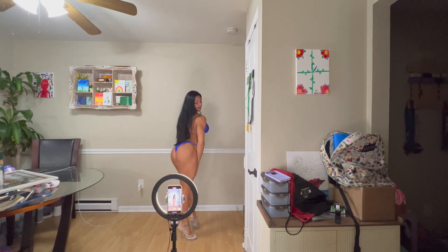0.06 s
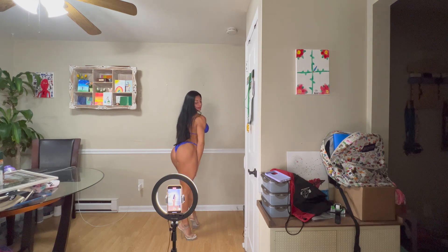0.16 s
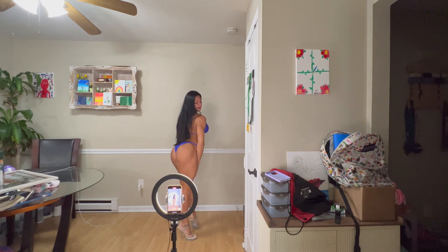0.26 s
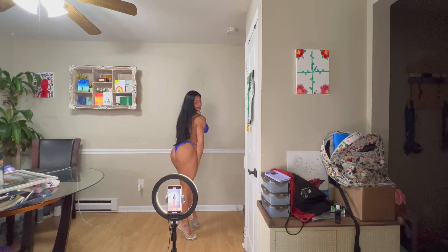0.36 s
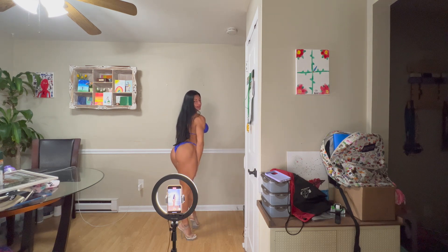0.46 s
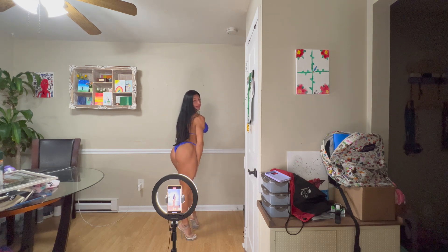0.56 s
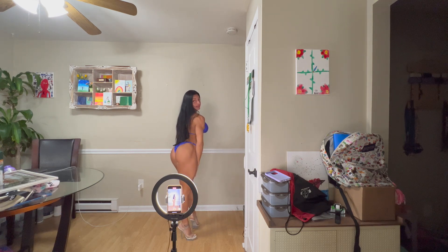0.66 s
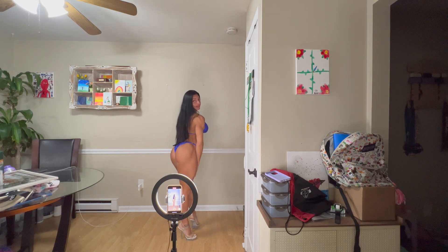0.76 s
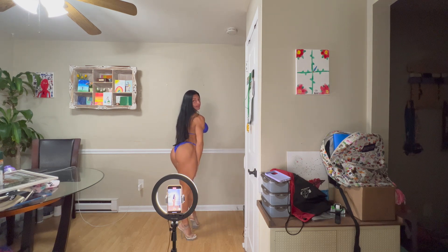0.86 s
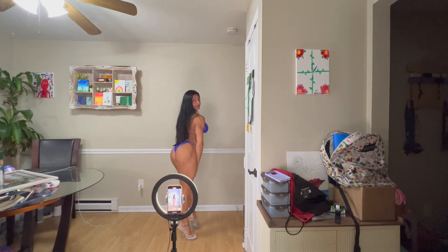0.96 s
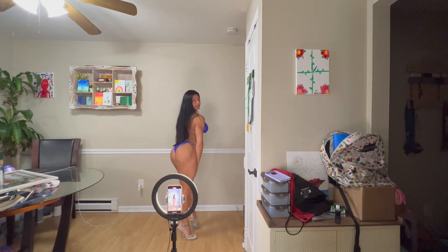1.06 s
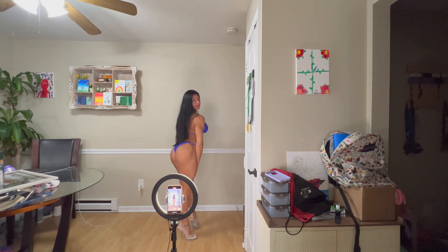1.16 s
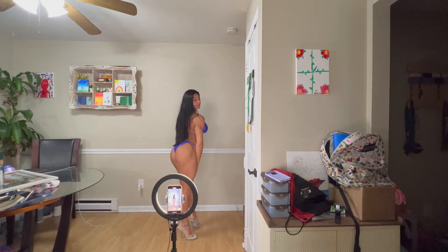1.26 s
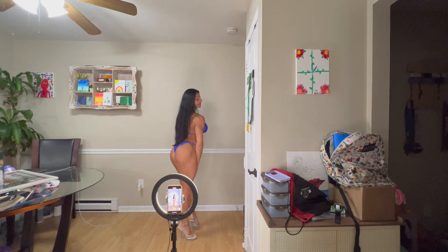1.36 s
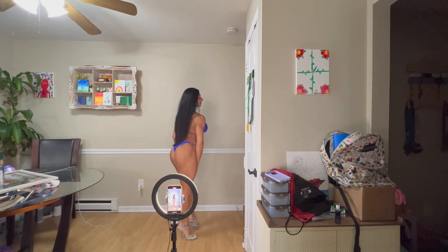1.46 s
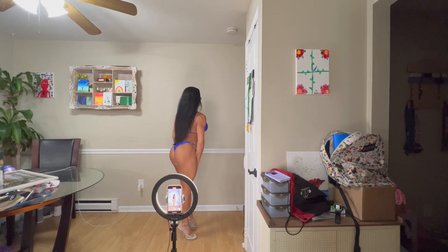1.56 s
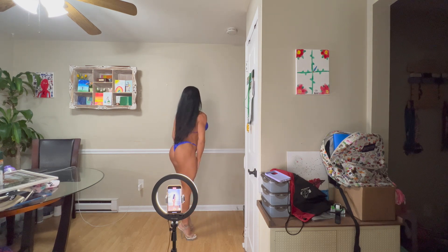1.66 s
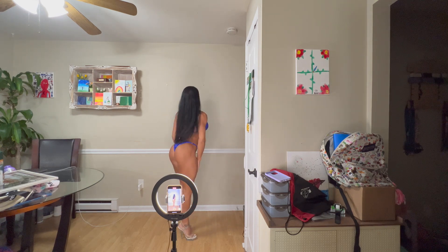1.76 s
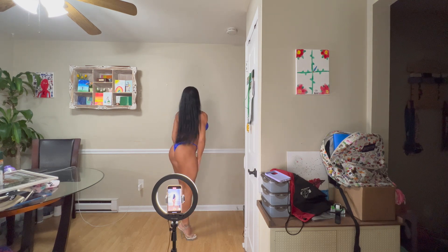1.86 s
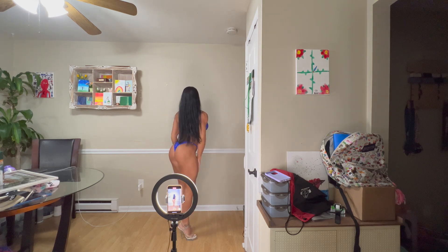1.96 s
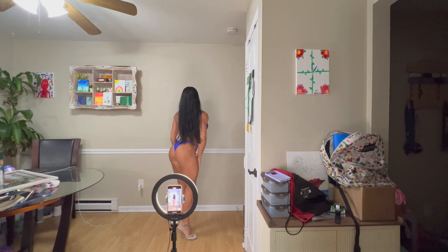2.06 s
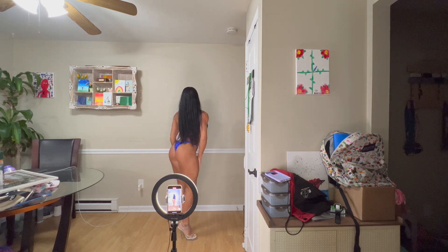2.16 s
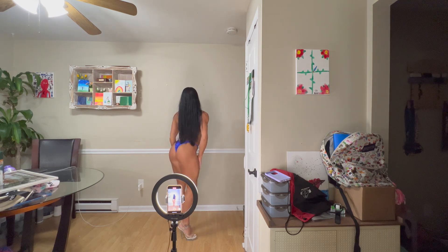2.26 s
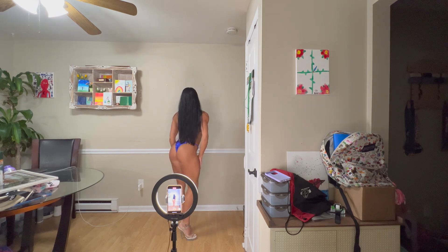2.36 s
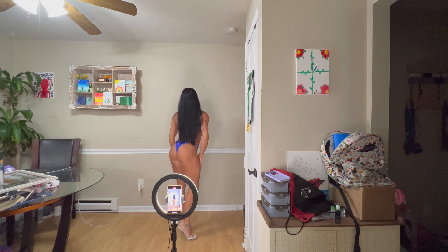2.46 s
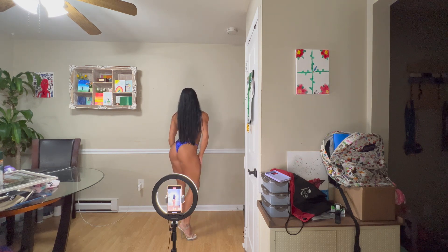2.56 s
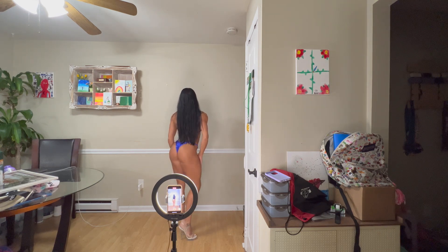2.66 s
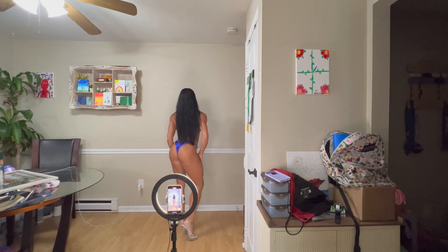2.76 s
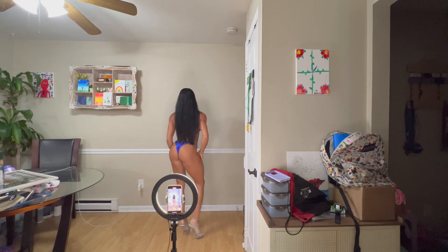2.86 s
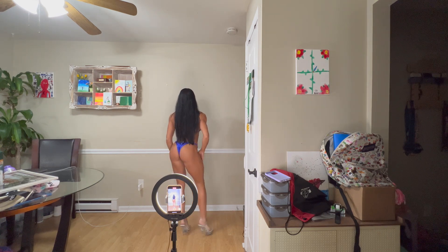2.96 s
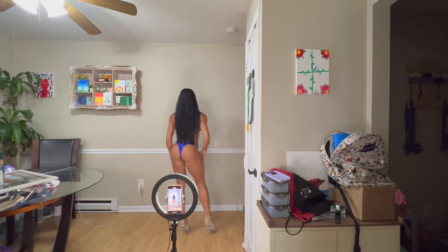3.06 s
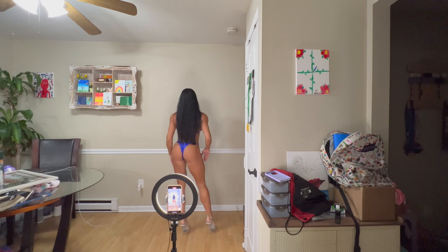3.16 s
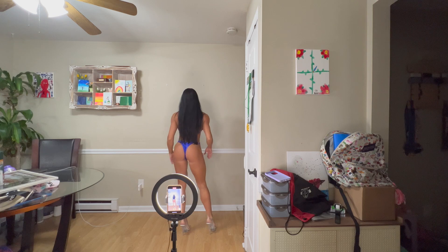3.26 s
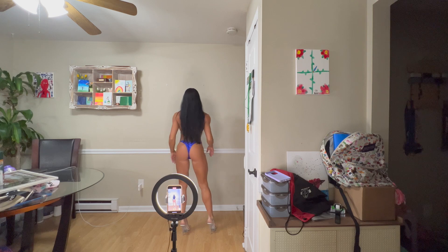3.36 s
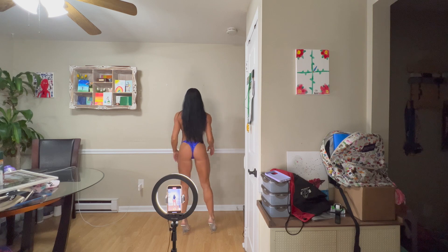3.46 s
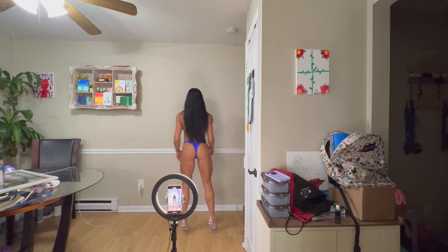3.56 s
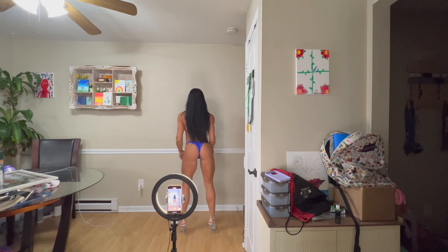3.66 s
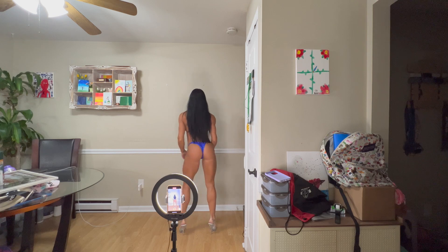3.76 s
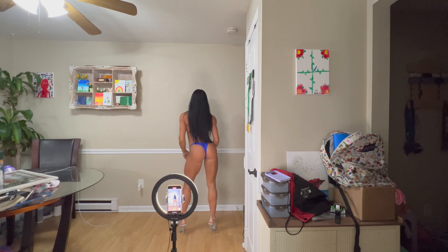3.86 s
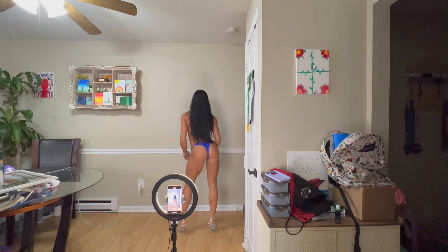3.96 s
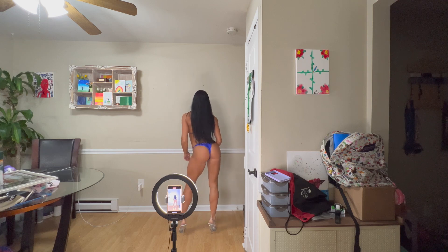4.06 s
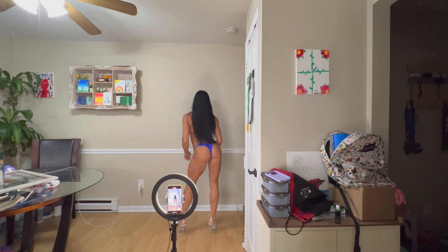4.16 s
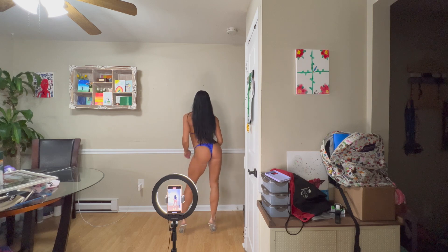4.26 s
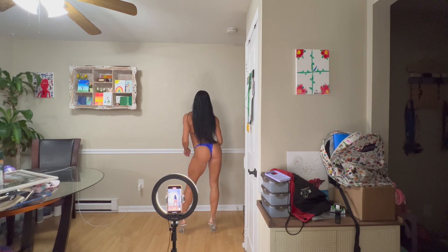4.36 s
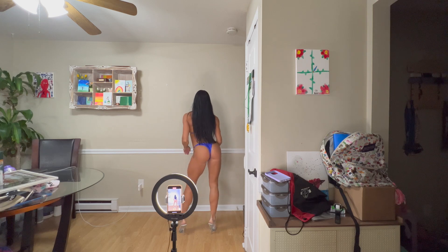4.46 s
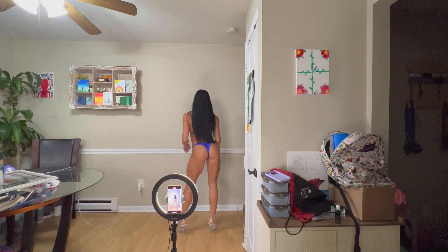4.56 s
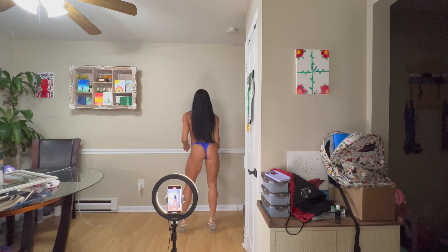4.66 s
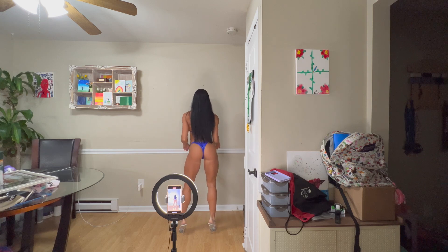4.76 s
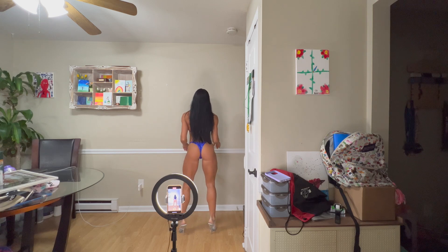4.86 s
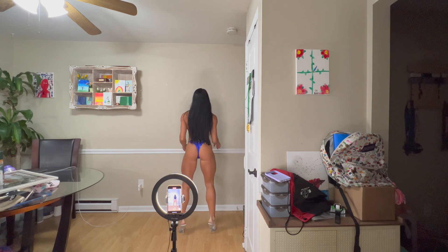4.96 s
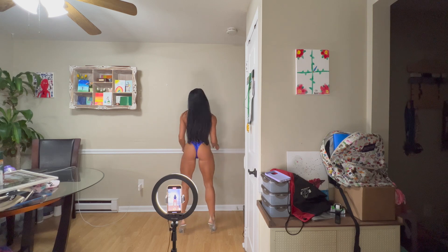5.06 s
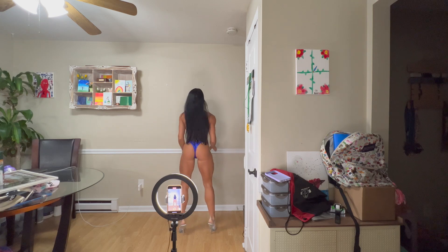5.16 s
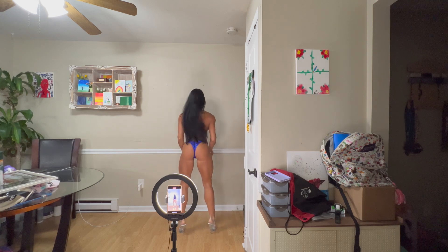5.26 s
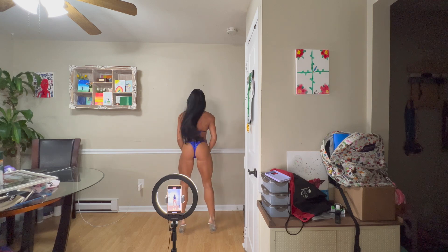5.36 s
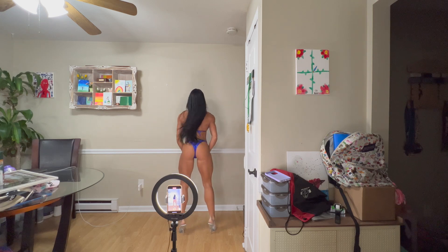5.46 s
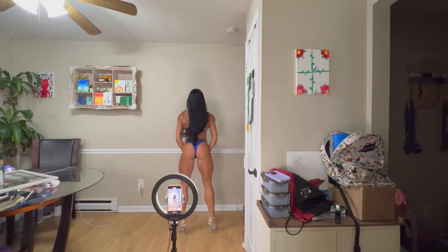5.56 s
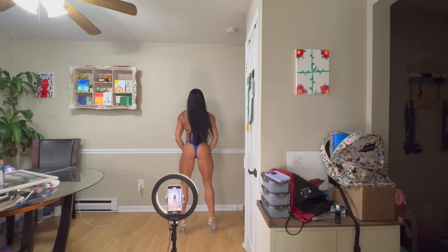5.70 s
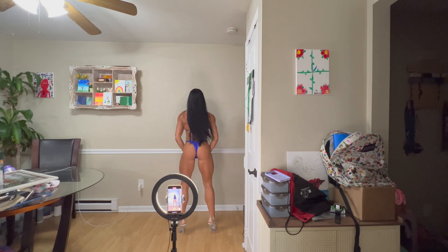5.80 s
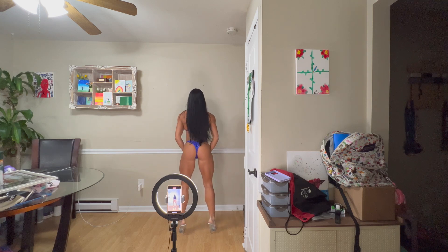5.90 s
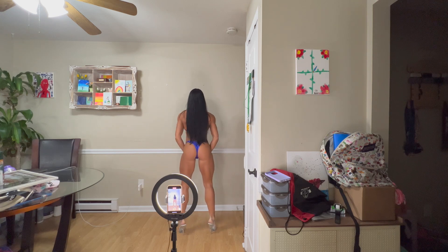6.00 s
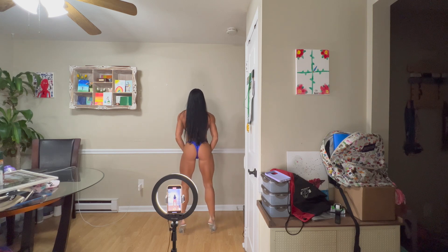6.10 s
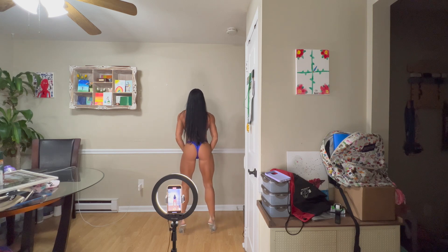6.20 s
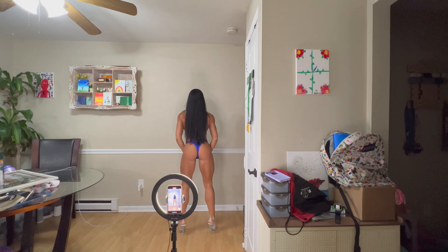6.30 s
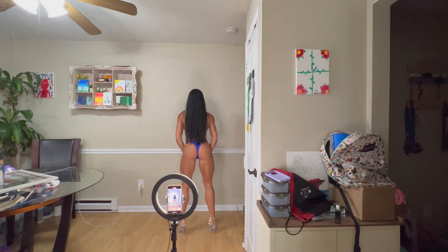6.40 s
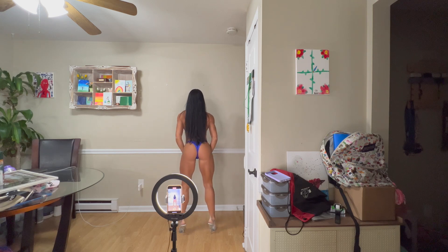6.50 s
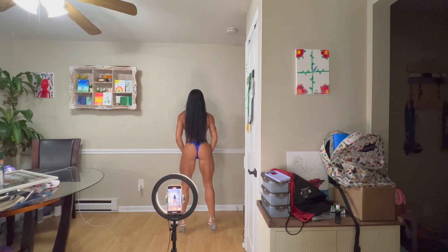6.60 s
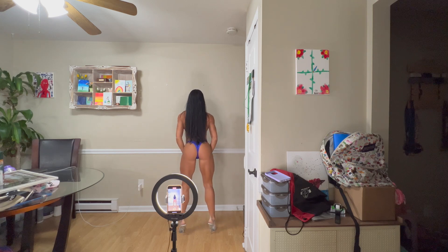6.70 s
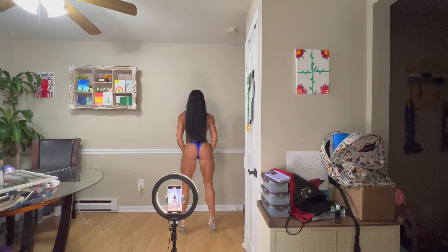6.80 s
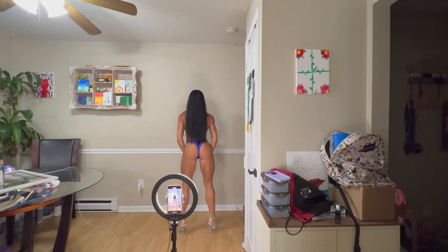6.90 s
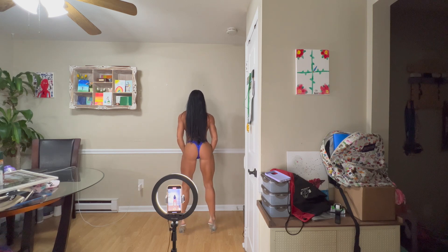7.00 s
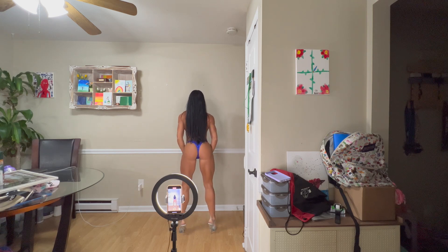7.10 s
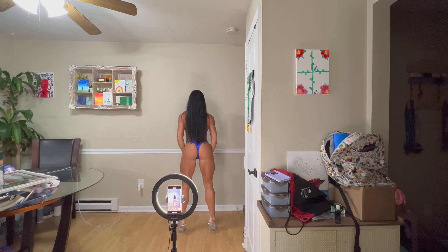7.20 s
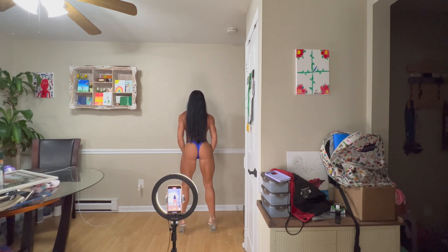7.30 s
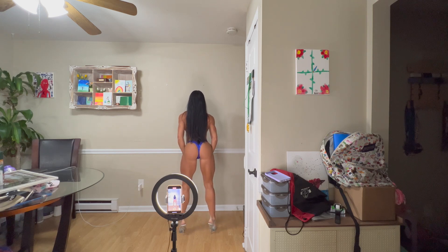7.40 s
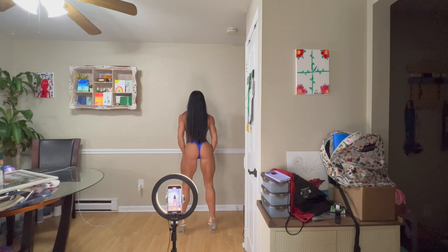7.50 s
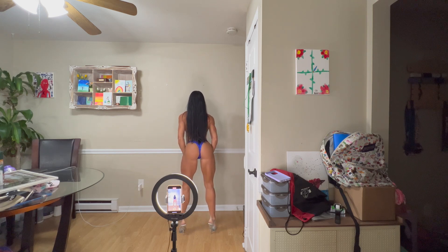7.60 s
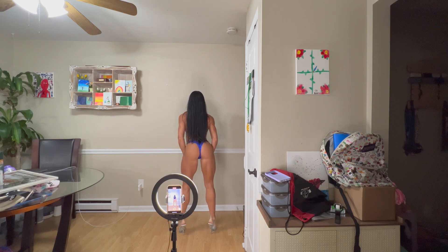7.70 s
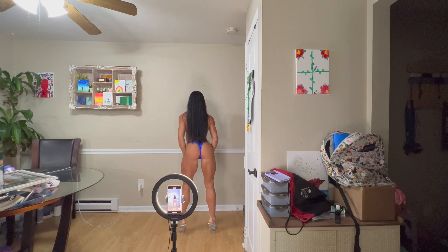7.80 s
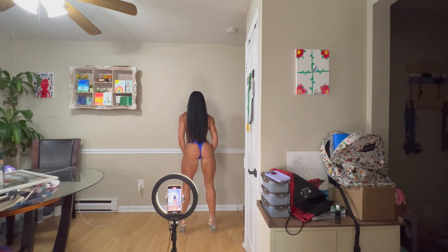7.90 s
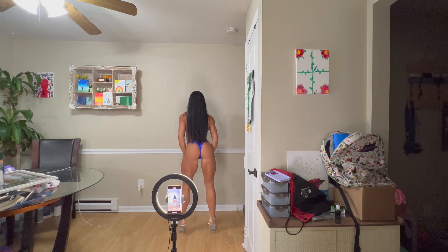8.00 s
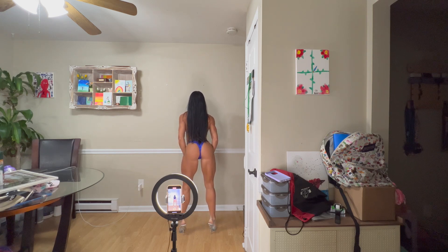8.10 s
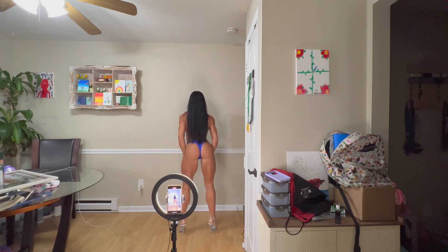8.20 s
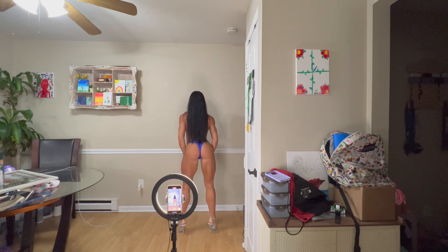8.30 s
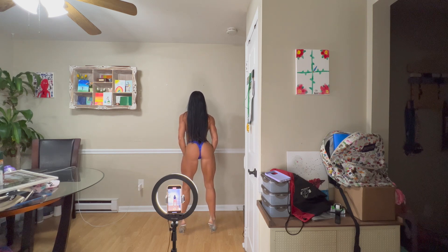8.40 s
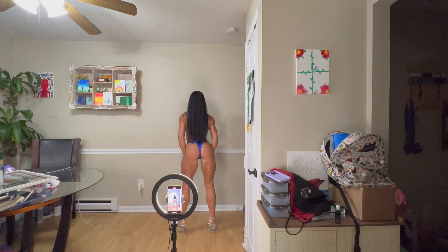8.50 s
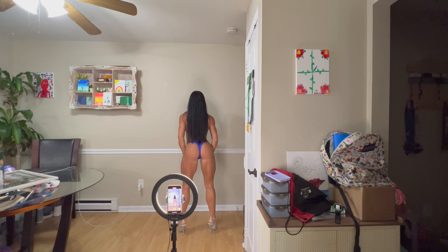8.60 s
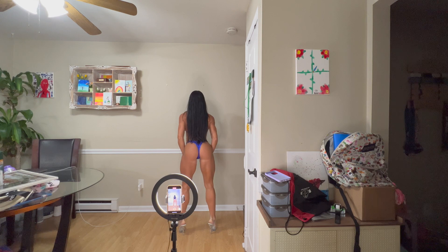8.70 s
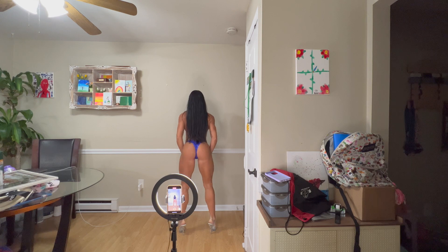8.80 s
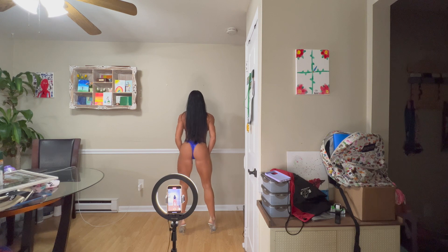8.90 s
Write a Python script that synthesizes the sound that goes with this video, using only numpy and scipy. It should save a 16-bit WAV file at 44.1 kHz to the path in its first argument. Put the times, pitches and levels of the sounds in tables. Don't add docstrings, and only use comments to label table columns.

```python
import sys
import numpy as np
from scipy import signal
from scipy.io import wavfile
from scipy.ndimage import uniform_filter1d

SR = 44100
rng = np.random.default_rng(int(sys.argv[2]) if len(sys.argv) > 2 else 0)


def pcm_store(signal):
    levels = np.round(np.clip(np.atleast_2d(signal), -1, 1) * 32767)
    wavfile.write(sys.argv[1], SR, levels.astype(np.int16).T)


def nominal_scale(level):
    x = np.asarray(level, float) / 20
    return 10 ** x


N = 394633

SOFT_DB = -33
DULL_HZ = 540

# f/Hz, level/dB per Hz
TIP = [(880, -28.5), (1500, 0.5), (2370, -0.5), (3660, 1), (4240, -2.5), (5020, -1), (9100, -13.5),
       (10100, -27), (10600, -29), (11900, -16), (13900, -28), (15100, -16), (16000, -10), (16900, -58)]
# f/Hz, level/dB, t60/s
PLATFORM = [(316, -1.5, 0.037), (417, -1.5, 0.023), (430, -3, 0.038), (532, 1.5, 0.018), (600, 2, 0.023),
            (670, 3, 0.016), (752, 6, 0.016), (838, 5.5, 0.019), (943, 2.5, 0.014), (1070, 3.5, 0.021),
            (1190, 5, 0.0094), (1350, 1.5, 0.016), (1650, -35, 0.032), (1980, -12, 0.0082)]
# f/Hz, level/dB, t60/s
BOARDS = [(41.6, -9, 0.14), (62.3, -17.5, 0.56), (99, -2.5, 0.087), (146, 5, 0.029), (200, 6.5, 0.057),
          (257, 1, 0.032), (329.4, -4.5, 0.078)]


def contact(rest, knocks, s, knock_db, click_db, knock_hz, boom_db, hard_db):
    luck = rng.standard_normal(60)
    soft = int(knock_db < SOFT_DB)
    blow_s = 0.0001 if knock_hz > DULL_HZ else 0.00023
    click = causal(TIP, hard_db)
    add(rest[soft], s, nominal_scale(click_db + 29) * click / np.linalg.norm(click))
    knock = ring(PLATFORM, luck, blow_s, spread_db=2.16, centre_hz=knock_hz, focus_db=6.0)
    add(knocks[soft], s + 0.00053, nominal_scale(knock_db + 24) * knock)
    boom = ring(BOARDS, luck[30:], 0.00018, spread_db=4.0, detune=0.0093)
    add(rest[soft], s + 0.0027, nominal_scale(boom_db + 37.0) * boom)


# t/s, knock level/dB, tip click level/dB, knock f/Hz, boom level/dB
LANDINGS = [
    (1.784, -37, -56, 417, -36.5),
    (1.806, -49.5, -60.5, 740, -57),
    (2.325, -24.5, -33, 840, -37),
    (2.786, -42, -49, 816, -47),
    (3.205, -20.5, -31.5, 457, -29),
    (5.335, -17, -33.5, 684, -44),
    (5.726, -25, -37.5, 650, -39),
    (7.457, -30.5, -55, 744, -46.5),
    (8.085, -57.5, -61, 1170, -57),
]
# t/s, knock level/dB, tip click level/dB, knock f/Hz, tip hardness/dB per octave
TAPS = [(1.974, -75, -62, 640, 6), (3.103, -49, -47, 440, -5), (3.973, -53, -51.5, 634, 0),
        (4.032, -34.5, -39.5, 960, -1), (4.121, -32.5, -36.5, 740, 1), (4.24, -38, -41, 667, 1),
        (4.838, -50, -58, 780, -4), (4.868, -34, -46, 900, -0.1), (5.291, -26, -30.5, 1060, 1),
        (5.647, -24, -37, 700, -0.1), (6.207, -52, -63.5, 556, 4), (6.941, -42.5, -59, 1030, .3),
        (6.982, -34, -42, 670, -0.5), (7.283, -59, -60, 1070, 1), (7.31, -42.5, -61, 734, 3),
        (7.505, -27.5, -47, 824, 1.5)]


def footfalls(rest, knocks):
    for s, knock_db, click_db, knock_hz, boom_db in LANDINGS:
        hard_db = 3.5 if knock_hz > DULL_HZ else -6.5
        contact(rest, knocks, s, knock_db, click_db, knock_hz, boom_db, hard_db)
    for s, knock_db, click_db, knock_hz, hard_db in TAPS:
        boom_db = -37.5 + 0.54 * knock_db
        contact(rest, knocks, s, knock_db, click_db, knock_hz, boom_db, hard_db)


# t/s, level/dB, f/Hz
STEMS = [(1.8064, -35.5, 1730), (2.3235, -12, 1470), (3.1039, -34, 3060), (3.2059, -25.5, 1450),
         (4.0322, -38, 2720), (4.1205, -32, 2500), (4.2388, -32.5, 3620), (4.8684, -40, 1480),
         (5.2903, -38, 2630), (5.3348, -20.5, 2600), (5.7252, -21.5, 2840), (5.6464, -41, 1650),
         (6.984, -31.5, 1630), (7.4566, -25.5, 1590), (7.5038, -23.5, 1440)]


def stem_rings(rest):
    for s, db, hz in STEMS:
        modes = [(hz, 0, .0025), (4630, -28.5, .0015)]
        stem = ring(modes, np.zeros(4), contact_s=.00003)
        add(rest[int(db < SOFT_DB)], s, nominal_scale(db + 13) * stem)


# t/s, level/dB, hardness/dB per octave
SNAPS = [
    (3.364, -55, 24),
    (3.927, -59.5, 12),
    (4.7174, -56, 10),
    (4.809, -56, 15),
    (8.5857, -60, 8),
]


def strap_snaps(rest):
    for s, db, hard_db in SNAPS:
        snap = causal(TIP, hard_db)
        add(rest[1], s, nominal_scale(db + 29.5) * snap / np.linalg.norm(snap))


def steps():
    rest, knocks = np.zeros((2, N)), np.zeros((2, N))
    footfalls(rest, knocks)
    stem_rings(rest)
    strap_snaps(rest)
    return rest, knocks


# t/s, length/s, rasp level/dB, centre f/Hz, place of the peak/0-1
BRUSHES = [
    (1.34, 0.3, -61, 5800, 0.58),
    (1.576, 0.16, -62.5, 5100, 0),
    (1.732, 0.06, -63.5, 5960, 0.4),
    (2.578, 0.22, -46.5, 7600, 0.44),
    (2.763, 0.14, -50.5, 6500, 0),
    (3.465, 0.086, -57.5, 5300, .35),
    (3.52, 0.27, -48.5, 4270, 0.48),
    (5.587, 0.084, -58.5, 5330, .8),
    (6.857, .05, -63, 4450, .45),
    (7.59, 0.059, -62, 4800, .2),
]


def brushes():
    out, grip = np.zeros(N), slipping(size=N)
    for s, length, rasp_db, rasp_hz, peak in BRUSHES:
        u, pressure = stroke(length, peak)
        slips = grip[round(s * SR):][:len(u)]
        rasp = evened(signal.oaconvolve(slips, causal(TIP))[:len(u)])
        band = evened(resonate(resonate(slips, rasp_hz, 3600.0), rasp_hz, 3600.0))
        add(out, s, nominal_scale(rasp_db) * evened(rasp + 1.38 * band) * pressure)
    return out


# t/s, length/s, rumble level/dB, first f/Hz, last f/Hz
GRINDS = [(1.733, 0.072, -57.5, 456, 440), (2.456, 0.17, -51.5, 720, 485), (2.549, 0.23, -49, 1200, 544),
          (2.756, 0.09, -47, 730, 560), (2.846, 0.19, -53.5, 500, 415), (3.47, 0.2, -60, 260, 244),
          (3.597, .17, -52, 624, 860), (5.211, 0.045, -60.5, 430, 400), (5.578, 0.27, -51, 700, 1050),
          (6.874, 0.056, -58.5, 800, 1000), (7.6, 0.15, -57, 845, 800)]


def grinds():
    out, grip = np.zeros(N), slipping(size=N)
    for s, length, rumble_db, first_hz, last_hz in GRINDS:
        u, pressure = stroke(length, curve=2.45)
        slips = grip[round(s * SR):][:len(u)]
        rumble_hz = first_hz + (last_hz - first_hz) * u
        boards = evened(resonate(resonate(slips, 130.0, 260.0), 223.0, 340.0))
        rumble = evened(resonate(resonate(slips, rumble_hz, 740.0), rumble_hz, 2100.0))
        add(out, s, nominal_scale(rumble_db) * (rumble + nominal_scale(-8) * boards) * pressure)
    return out


# t/s, length/s, level/dB, first f/Hz, last f/Hz
SQUEAKS = [
    (.465, .055, -67, 3260, 3180),
    (0.507, 0.079, -63.5, 2490, 2680),
    (1.597, 0.089, -55, 1090, 1040),
    (1.653, .1, -55, 900, 850),
    (1.632, .11, -61, 1470, 1260),
    (3.425, .09, -65, 3130, 3000),
    (4.686, 0.11, -66, 2910, 2860),
    (8.883, .065, -61, 3160, 3180),
]


def squeaks():
    out, noise = np.zeros(N), rng.standard_normal(N)
    for s, length, db, first_hz, last_hz in SQUEAKS:
        u, pressure = stroke(length, peak=0.19, curve=1.2)
        glide_hz = first_hz + (last_hz - first_hz) * u
        tone = evened(resonate(noise[round(s * SR):][:len(u)], glide_hz, 45.0))
        add(out, s, nominal_scale(db) * tone * pressure)
    return out


# t/s, latch level/dB, case level/dB
TICKS = [
    (0.632, -44.5, -60),
    (4.632, -47.5, -58),
    (6.6474, -47, -58.5),
    (8.6362, -45.5, -56),
]
# f/Hz, level/dB, t60/s
TICKER = [(1030, 9, 0.01), (1356, 3, 0.027), (2500, -0.5, 0.0028), (3960, -3.5, 0.012), (4700, 7, 0.0031),
          (5330, 8.5, 0.0013), (6370, -4, 0.0071)]


def ticker():
    out = np.zeros(N)
    latch = ring(TICKER[2:], np.zeros(2 * len(TICKER[2:])), contact_s=.00005)
    case = ring(TICKER[:2], np.zeros(4), contact_s=.00005)
    for s, click_db, case_db in TICKS:
        rattle = rng.standard_normal(2600) * signal.windows.tukey(2600, .5)
        body = nominal_scale(click_db - 11) * latch + nominal_scale(case_db + 3.5) * case
        add(out, s - .014, signal.fftconvolve(rattle, body))
    return out


def stroke(length, peak=0.36, curve=1.26):
    u, peak = np.linspace(0, 1, round(length * SR)), np.clip(peak, .05, .95)
    away = np.where(u < peak, 1 - u / peak, (u - peak) / (1 - peak))
    return u, nominal_scale(-7 * away ** curve) * signal.windows.tukey(len(u), .3)


def slipping(size):
    grip = evened(uniform_filter1d(rng.standard_normal(size), size=300))
    return rng.standard_normal(size) * nominal_scale(2.8 * grip)


def ring(modes, luck, contact_s, spread_db=3., detune=0.031, centre_hz=None, focus_db=5.):
    hz, db, t60 = np.transpose(modes)[:, :, None]
    t = np.arange(SR // 6) / SR
    share, shift = luck[:2 * len(hz)].reshape(2, -1, 1)
    if centre_hz:
        db = db - focus_db * np.log2(hz / centre_hz) ** 2
    sign = (-1.) ** np.argsort(np.argsort(hz, axis=0), axis=0)
    level = sign * nominal_scale(db + spread_db * share - 60 * t / t60)
    sound = (level * np.sin(2 * np.pi * hz * (1 + detune * shift) * t)).sum(0)
    sound = signal.lfilter([1], [1, -np.exp(-1 / (contact_s * SR))], sound)
    return sound / np.linalg.norm(sound)


def causal(points, tilt_db=0.):
    hz = abs(np.fft.fftfreq(2048, 1 / SR))
    db = read(points, hz) + tilt_db * np.log2((hz + 1) / 4000)
    log_gain = np.log(nominal_scale(np.maximum(db, -100)))
    return np.fft.ifft(np.exp(np.conj(signal.hilbert(log_gain)))).real[:1024]


def resonate(x, hz, width_hz):
    turn = np.exp(2j * np.pi * np.cumsum(hz * np.ones(len(x))) / SR)
    r = np.exp(-np.pi * width_hz / SR)
    return 2 * (turn * signal.lfilter([1 - r], [1, -r], x / turn)).real


def evened(x):
    return x / np.sqrt(np.mean(x ** 2) + 1e-20)


def read(points, hz):
    f, value = np.transpose(points)
    return np.interp(np.log(hz + 1), np.log(f + 1), value)


def add(mix, s, sound):
    part = mix[..., round(s * SR):][..., :sound.shape[-1]]
    part += sound[..., :part.shape[-1]]


# f/Hz, t60/s
ROOM = [(60, 0.67), (200, 0.39), (800, 0.39), (2200, 0.46), (6000, 0.5), (12000, 0.14)]
# f/Hz, left-right level/dB
EARS = [(60, 9), (150, -6.5), (380, -1), (950, -5.5), (2380, 0.5), (5980, -11), (15000, 5)]


def room(x, direct_db, hold_s, fade_s):
    taps = np.zeros((3, 2, SR // 2))
    at = np.arange(100, SR // 2 - 10, 10) + rng.integers(0, 10, (3, 2, (SR // 2 - 101) // 10))
    np.put_along_axis(taps, at, rng.choice([-1., 1.], at.shape), axis=2)
    hz, t, z = signal.stft(taps, SR, nperseg=256)
    alike = np.clip(np.maximum(1.1 - hz / 490.0, hz / 25600.0 - .6), 0, .98)[:, None]
    z[:, 1] = alike * z[:, 0] + np.sqrt(1 - alike ** 2) * z[:, 1]
    decay_db = -60 * np.maximum(t - hold_s, 0) / read(ROOM, hz)[:, None]
    z *= nominal_scale(decay_db - 20 * (t / fade_s) ** 4)
    z *= nominal_scale(np.multiply.outer([.5, -.5], read(EARS, hz))[..., None])
    tails = signal.istft(z, SR, nperseg=256)[1]
    tails[..., :100] = 0
    tails /= np.sqrt((tails ** 2).sum(2).mean())
    tails[..., 0] = nominal_scale(direct_db)
    turn = np.arange(N) / SR * 7.3
    share = np.cos(np.pi * (turn + np.arange(3)[:, None]) / 3) * np.sqrt(2 / 3)
    return sum(signal.oaconvolve(x[None] * w, tail, axes=1)[:, :N] for w, tail in zip(share, tails))


# f/Hz, level/dB rms
HUM = [(60, -58), (120, -47.5), (240, -73.5), (610, -80.5)]


def hum():
    t, tones = np.arange(N) / SR, np.zeros(N)
    for hz, db in HUM:
        strength = nominal_scale(db + 3 + 1.8 * wander(14.))
        tones += strength * np.sin(2 * np.pi * hz * t + .6 * wander(6.))
    return tones * nominal_scale(np.array([[-1.1], [1.1]]))


def wander(rate_hz):
    t = np.arange(0, N, 64) / SR
    rates = rate_hz * np.geomspace(.05, 1, 24)
    slow = sum(np.sin(2 * np.pi * (f * t + rng.random())) / np.sqrt(f) for f in rates)
    return np.interp(np.arange(N) / SR, t, evened(slow))


# f/Hz, level/dB per Hz
RUMBLE = [(12, -77), (20, -16), (51, -7), (70, -5.5), (91, -15), (101, -12), (123, -8.5), (136, -2),
          (150, -17.5), (242, -23), (275, -24.5), (344, -29), (400, -37), (520, -76), (880, -120)]


def rumble():
    return air(RUMBLE, -51.5, size=4096, patchy_db=-1.1)


# f/Hz, level/dB per Hz
HISS = [(180, -47), (300, -4.5), (593, -12), (645, 0), (762, -23.5), (870, -10.5), (1230, -14),
        (1720, -3.5), (2100, -7.5), (2440, -28), (7200, -21.5), (9390, -34), (10600, -47), (11700, -31.5),
        (13800, -37), (16000, -44)]


def hiss():
    return air(HISS, -57, size=512, patchy_db=1.65)


# f/Hz, left-right likeness/-1 to 1
SAME = [(60, 0.48), (150, 0.59), (380, -0.35), (950, -0.32), (2380, -0.16), (5980, 0.023), (15000, 0.25)]
# f/Hz, left-right level/dB
LEAN = [(60, 0.5), (150, 3.5), (380, -3), (950, -4), (2380, -16.5), (5980, -11), (15000, 3.5)]


def air(points, db, size, patchy_db):
    frames, hz = N * 4 // size + 5, np.fft.rfftfreq(size, 1 / SR)
    a, b, c, d, patches = rng.standard_normal((frames, len(hz), 5)).T
    patches = evened(uniform_filter1d(uniform_filter1d(patches, size=9, axis=0), size=9, axis=1))
    same = np.clip(read(SAME, hz), -1, 1)[:, None]
    left = a + 1j * b
    right = same * left + np.sqrt(1 - same ** 2) * (c + 1j * d)
    lean_db = np.multiply.outer([.5, -.5], read(LEAN, hz))[..., None]
    z = np.array([left, right]) * nominal_scale(read(points, hz)[:, None] + patchy_db * patches + lean_db)
    return nominal_scale(db) * evened(signal.istft(z, nperseg=size, noverlap=size - size // 4)[1][:, :N])


def scene():
    rest, knocks = steps()
    blows = room(rest[0] + knocks[0], direct_db=-17.0, hold_s=0.002, fade_s=0.29)
    blows += room(rest[1] + knocks[1], direct_db=-22.0, hold_s=0.0066, fade_s=0.21)
    blows += nominal_scale(-7.0) * knocks.sum(axis=0)
    rubbing = brushes() + grinds() + squeaks() + ticker()
    rubs = room(rubbing, direct_db=-16.0, hold_s=0.0078, fade_s=0.05)
    return blows + rubs + rumble() + hiss() + hum()


def band_limit(x):
    return signal.sosfilt(signal.butter(12, 16950, fs=SR, output="sos"), x)


# f/Hz, level/dB per bin
GATE = [(9550, -140), (9800, -92), (10300, -79), (11000, -79), (11250, -140), (12900, -140), (13300, -97),
        (13600, -84), (14300, -84), (14600, -103), (15800, -101), (16000, -60)]


def record(dry):
    thin = signal.sosfilt(signal.butter(3, 46., "high", fs=SR, output="sos"), dry)
    hz, _, z = signal.stft(thin, SR, nperseg=512, noverlap=384)
    power = (abs(z) ** 2).mean(0)
    power = uniform_filter1d(uniform_filter1d(power, size=7, axis=0), size=5, axis=1)
    z *= power > nominal_scale(read(GATE, hz))[:, None] ** 2
    mix = signal.istft(z, SR, nperseg=512, noverlap=384)[1][:, :N]
    return band_limit(mix)


dry = scene()
out = record(dry)
pcm_store(out)
```